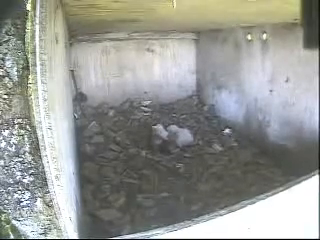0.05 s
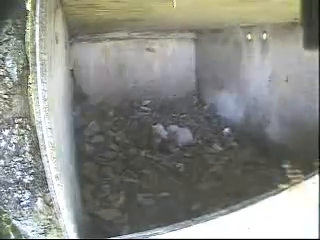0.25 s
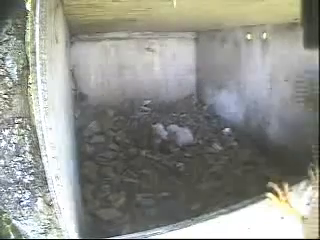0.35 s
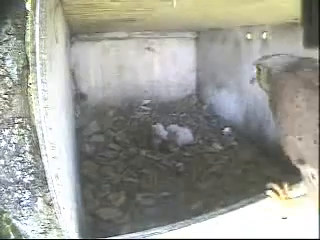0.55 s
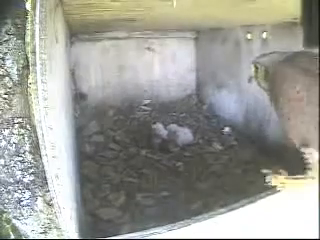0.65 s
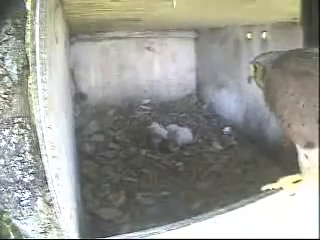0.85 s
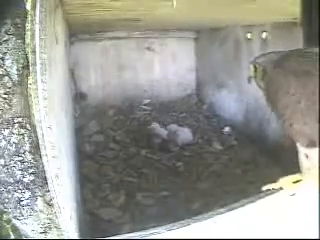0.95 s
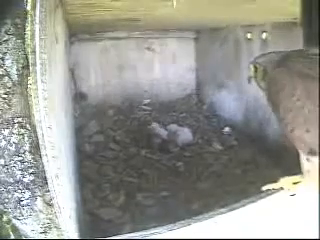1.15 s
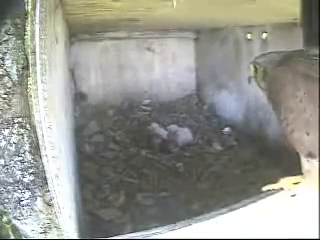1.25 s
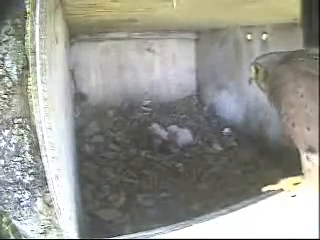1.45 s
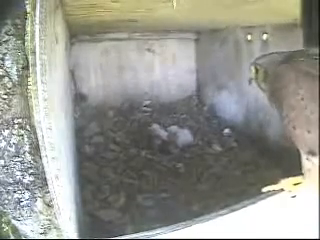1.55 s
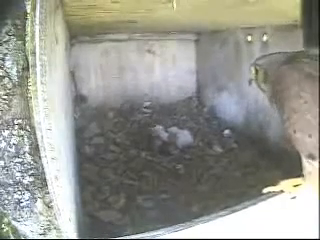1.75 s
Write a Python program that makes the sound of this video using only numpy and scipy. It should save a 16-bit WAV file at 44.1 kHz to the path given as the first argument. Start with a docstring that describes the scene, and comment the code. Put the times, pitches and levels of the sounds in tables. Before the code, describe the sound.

Close claw taps on wood as a falcon lands at a nest box: one loud, squeaky stamp, small clicks and scratches as it shifts its feet, then another stamp. Hiss and faint outdoor air continue behind.

```python
"""Falcon on a nestbox ledge

A falcon lands on a wooden nestbox and shifts its feet, close to a small camera microphone.
Two hard stamps squeal near 6 kHz and overload the input; toes knock, claws tick and scrape,
soles pad and slide. Behind the bird lie a slowly rising hiss, outdoor air and a faint mains hum."""
import sys
import numpy as np
from scipy import signal
from scipy.fft import rfft, irfft
from scipy.io import wavfile
from scipy.ndimage import uniform_filter1d

SR = 44100
rng = np.random.default_rng(int(sys.argv[2]) if len(sys.argv) > 2 else 0)


def dump(signal):
    """Clip the signal to [-1, 1] and save it as 16-bit WAV at the path in sys.argv[1]."""
    limited = np.clip(np.atleast_2d(signal).T, -1, 1)
    pcm = np.round(limited * 32767).astype(np.int16)
    wavfile.write(sys.argv[1], SR, pcm)


N = 77175
T = np.arange(N) / SR

# Hard stamps, right by the microphone. Each row: start and grip length in seconds, squeal in dB, pitch in
# Hz at the bite, a third through and at the end, rasp and box ring in dB, thud time in seconds, thud in dB.
STAMPS = [(0.2535, 0.0144, 6.5, 6435, 5673, 6048, -9, -14.5, .2700, -17.5),
          (1.4507, .0130, 3.5, 6173, 6148, 6244, -8.5, -25.5, 1.4675, -19.5)]
# Claws slipping free. Each row: start in seconds, then snap, hollow knock and claw ring in dB.
SNAPS = [(0.2642, 3, -11.5, -16), (0.2677, -9, -21, -23), (1.4645, -14, -50, -7)]
# Toes on the ledge. Each row: start in seconds, wood and crack in dB, pitch factor,
# hardness in dB per octave.
KNOCKS = [(0.2274, -13.5, -14.5, 1, 7), (0.2311, -18, -13, 0.98, -3), (0.2537, -10, -28, 1.13, 1.5),
          (0.2678, -13.5, -28, 1.35, -8), (.7752, -14, -17, 1.06, 4), (1.4248, -13, -13, 1.02, 3),
          (1.4280, -32, -16, 1, 4), (1.4507, -12.5, -23, 1.16, -6)]
# Claw tips touching down. Each row: start in seconds, level in dB, pitch in Hz.
TICKS = [(.3465, -19, 6000), (.4178, -1, 5700), (.4209, -12, 5700), (.4229, -8, 5600), (.4332, -12, 5700),
         (.6995, -18, 6000), (.7057, -18, 5700), (.7215, -15, 6200), (.7714, -7, 7000), (.7958, -16, 5900),
         (.8063, -8, 5900), (.8299, -7, 5750), (.9072, -4, 5800), (.9218, -15, 5500)]
# Dragged claws. Each row: start and length in seconds, level in dB, band centre in Hz.
SCRAPES = [(0.376, 0.033, -26, 5040), (.448, 0.017, -28.5, 5600), (0.601, 0.009, -19, 4350),
           (0.703, 0.013, -24, 4640), (0.715, 0.02, -25, 5950), (0.7705, 0.0093, -15.5, 7000),
           (0.791, 0.018, -25.5, 5470), (0.8072, 0.0039, -18.5, 5300), (0.8325, .007, -16.5, 5370),
           (0.877, .005, -32, 4560), (0.882, 0.021, -22.5, 5230), (0.91, 0.0081, -19, 5800),
           (.9160, 0.015, -27.5, 5400)]
# Soft footfalls. Each row: start in seconds, level in dB, pitch factor.
STEPS = [(.3460, -19.5, 0.99), (0.3625, -20.5, 0.98), (.3650, -18.5, 0.93), (0.397, -25, 0.72),
         (.4345, -26, 1), (0.609, -24, 1.11), (.7235, -21, 1.06), (.8340, -23, 1.05)]
# Sliding soles. Each row: start and length in seconds, level in dB.
SHUFFLES = [(0.34, 0.07, -33), (0.876, 0.051, -39)]

# What rings when struck. Each row: base frequency in Hz, relative level in dB, seconds to fall 60 dB.
LEDGE_MODES = [(1225, 2, .02), (1510, -7, .012), (2560, -5, .012), (2900, -10, .010), (3720, -5, .011),
               (4080, -5, .012), (4750, -9, .008), (5600, -8, .008), (7000, -10, .008)]
BOX_MODES = [(610, -20.5, 0.071), (810, -9.5, 0.033), (1290, -26, 0.035), (1554, -1.5, 0.02),
             (1660, -15, .018)]
CLAW_MODES = [(3120, -3, .03), (3600, -12, 0.031)]

# Noise spectra, close sounds first. Each row: frequency in Hz, relative level in dB.
GRIP_RASP = [(150, -14.5), (700, -14), (1500, -30), (2300, -9), (2800, -4), (3150, 0), (3600, 4),
             (4100, -13.5), (5200, -0.5), (6200, 2), (6700, 8), (7400, -16), (8500, -7), (9300, -1),
             (10200, -42), (16000, -51)]
BOX_RING = [(300, -31), (3000, -16.5), (4900, -20), (5750, 7.5), (6500, -14), (8000, -22), (10000, -21),
            (13000, -75)]
DRY_CRACK = [(200, -12), (900, -4), (1300, 3.5), (2000, -20), (2700, 3.5), (4200, 5.5), (6000, -2.5),
             (7700, 0.5), (8800, -39), (16000, -51)]
WOOD_GRAIN = [(200, 22.5), (1000, 6), (1900, 3.5), (3000, 1), (4500, 0), (6000, 4), (7800, -2.5),
              (9500, -18), (13000, -53)]
SOLE_RUB = [(40, -27), (90, 1.5), (160, 2), (260, -23), (520, -6), (615, 11), (720, -8), (1100, -13),
            (1550, 1), (2100, -14.5), (4000, -13), (9000, -24)]
HISS = [(1000, -23.5), (2000, -14.5), (3200, -8.5), (4300, -6.5), (5100, -1.5), (5750, 1.5), (6350, 0),
        (7000, -8), (8000, -12), (9000, -21), (10200, -24), (11500, -52), (13000, -70)]
OUTDOOR_AIR = [(20, -14), (60, -5.5), (130, -14.5), (300, -3), (700, -1.5), (980, 2.5), (1150, -1),
               (1380, -10), (1850, -3), (2500, -12), (4000, -8.5), (9000, -52)]
LOW_RUMBLE = [(3, 9.5), (12, -5), (30, -15), (60, -16), (150, -53)]
# Harmonics of the mains. Each row: frequency in Hz, rms level in dB.
MAINS_HUM = [(100, -57), (150, -53.5), (200, -55), (250, -57.5), (300, -59), (350, -55.5)]


def stamps():
    """Claws bite and squeal at a pitch that bends with the grip; then the bird's weight thuds down."""
    rise_s, thud_s, waver_hz = 0.0034, 0.006, 90.3
    out, rasp, ring = 0, noise(GRIP_RASP), noise(BOX_RING)
    waver = walk(rate=600) * waver_hz
    for start, grip, db, bite_hz, mid_hz, end_hz, rasp_db, ring_db, thud_at, thud_db in STAMPS:
        hz = np.interp(T, start + grip * np.array([0, 1 / 3, 1]), [bite_hz, mid_hz, end_hz]) + waver
        squeal = np.sin(2 * np.pi * np.cumsum(hz * (T > start)) / SR)
        out += undb(db) * squeal * envelope(start, rise_s, hold=grip - rise_s, t60=0.025)
        out += undb(rasp_db) * rasp * envelope(start, rise=0.00013, hold=grip + 0.0025, t60=0.013)
        out += undb(ring_db) * ring * envelope(start, rise=grip, hold=grip, t60=0.16)
        out += undb(thud_db) * np.exp(-(2 * (T - thud_at) / thud_s) ** 2)
    return out


def claw_snaps():
    """A claw slips free in a stamp: a snap, its own short ring and a hollow knock of the box."""
    hollow_hz, hollow_t60_s = 381.15, 0.026
    out, crack = 0, noise(DRY_CRACK)
    for at, db, knock_db, ring_db in SNAPS:
        out += undb(db) * crack * envelope(at, rise=0.0002, hold=0, t60=0.0048)
        out += undb(ring_db) * strike(at, CLAW_MODES)
        out += strike(at, [(hollow_hz, knock_db, hollow_t60_s)])
    return out


def toe_knocks():
    """A toe hits the ledge: a dry crack and short wooden modes, brighter under a harder touch."""
    out, crack = 0, noise(DRY_CRACK)
    lowest_hz = LEDGE_MODES[0][0]
    for at, wood_db, crack_db, pitch, hardness in KNOCKS:
        modes = [(hz, db + hardness * np.log2(hz / lowest_hz), t60) for hz, db, t60 in LEDGE_MODES]
        out += undb(wood_db) * strike(at, modes, pitch)
        out += undb(crack_db) * crack * envelope(at, rise=0.00022, hold=0, t60=0.017)
    return band(out, hz=855, kind="high", order=3)


def claw_ticks():
    """A claw tip touches: a few bright cycles and a small click."""
    rise_s, click_db = 0.0004, -15
    out, crack = 0, noise(DRY_CRACK)
    for at, db, hz in TICKS:
        age = np.maximum(T - at, 0)
        ping = age / rise_s * np.exp(1 - age / rise_s) * np.sin(2 * np.pi * hz * age)
        click = undb(click_db) * crack * envelope(at, rise=0.00026, hold=0, t60=0.01)
        out += undb(db) * (ping + click)
    return out


def claw_scrapes():
    """A dragged claw catches on the grain in quick, uneven slips, easing off along the stroke."""
    slips_per_s, sag_db = 3500, 4.5
    catches = rng.random(N) < slips_per_s / SR
    kicks = catches * rng.choice([-1, 1], N) * (1 + rng.random(N))
    out, slips = 0, colour(kicks, WOOD_GRAIN)
    for at, length, db, hz in SCRAPES:
        claw = unit(signal.lfilter(*signal.iirpeak(hz, Q=1.63, fs=SR), slips))
        progress = np.clip((T - at) / length, 0, 1)
        out += undb(db - sag_db * progress) * claw * envelope(at, rise=0.001, hold=length, t60=0.013)
    return out


def footfalls():
    """The pads of the feet sound the lower modes of the box."""
    return sum(undb(db) * strike(at, BOX_MODES, pitch) for at, db, pitch in STEPS)


def sole_shuffles():
    """A sole slides and softly rubs the box into sound."""
    rub = sum(undb(db) * envelope(at, rise=0.0089, hold=length, t60=0.061) for at, length, db in SHUFFLES)
    return noise(SOLE_RUB) * rub


def background():
    """Behind the bird: rising hiss, outdoor air, low rumble and mains hum."""
    hiss_db, hiss_db_per_s, air_db, rumble_db = -34, 3, -38, -38.5
    hiss = noise(HISS) * undb(hiss_db + hiss_db_per_s * T + 0.5 * walk(rate=34))
    air = noise(OUTDOOR_AIR) * undb(air_db + 0.5 * walk(rate=18))
    rumble = noise(LOW_RUMBLE) * undb(rumble_db)
    hum = sum(np.sqrt(2) * undb(db) * np.sin(2 * np.pi * (hz * T + rng.random())) for hz, db in MAINS_HUM)
    return hiss + air + rumble + hum


def strike(start, modes, pitch=1, contact_s=0.00024):
    """Damped modes after one blow, their frequencies scaled by pitch."""
    age = np.maximum(T - start, 0)
    ring = sum(undb(db) * np.sin(2 * np.pi * hz * pitch * age) * np.exp(-np.log(1000) * age / t60)
               for hz, db, t60 in modes)
    return -np.minimum(age / contact_s, 1) * ring


def envelope(start, rise, hold, t60):
    """Straight attack, then exponential release from hold seconds after the start."""
    age = T - start
    return np.clip(age / rise, 0, 1) * np.exp(-np.log(1000) * np.maximum(age - hold, 0) / t60)


def colour(x, points):
    """Shape a signal's spectrum by (Hz, dB) points, at rms 1."""
    hz, db = np.array(points).T
    bin_hz = np.maximum(np.arange(N // 2 + 1) * SR / N, 1)
    gain = undb(np.interp(np.log(bin_hz), np.log(hz), db))
    return unit(irfft(rfft(x) * gain, N))


def noise(points):
    """Noise with the given spectrum."""
    return colour(rng.standard_normal(N), points)


def walk(rate):
    """Smooth random drift at rms 1, changing about rate times a second."""
    size = int(SR / rate)
    drift = uniform_filter1d(rng.standard_normal(N), size, mode="wrap")
    return unit(uniform_filter1d(drift, size, mode="wrap"))


def band(x, hz, kind, order):
    """High-pass or low-pass filter."""
    return signal.sosfilt(signal.butter(order, hz, kind, fs=SR, output="sos"), x)


def undb(db):
    """Decibels to gain."""
    return 10 ** (np.asarray(db) / 20)


def unit(x):
    """Scale to rms 1."""
    return x / np.sqrt(np.mean(x ** 2) + 1e-18)


def scene():
    """One microphone close to the ledge; the foot sounds carry little treble above 9.5 kHz."""
    feet = toe_knocks() + claw_ticks() + claw_scrapes() + claw_snaps() + footfalls() + sole_shuffles()
    return (stamps() + band(feet, hz=9500, kind="low", order=8) + background())[None]


def record(dry):
    """The camera's input flattens the loudest peaks, dulls the treble and cuts the top."""
    clip_level, knee, top_hz = 0.63, 9.1, 16000
    oversampled = signal.resample_poly(dry, 4, 1, axis=-1)
    flattened = oversampled / (0.5 + np.abs(oversampled / clip_level) ** knee) ** (1 / knee)
    clipped = signal.resample_poly(flattened, 1, 4, axis=-1)
    dull = band(clipped, hz=9840, kind="low", order=2)
    return signal.sosfilt(signal.ellip(10, 0.2, 80, top_hz, fs=SR, output="sos"), dull)


dry = scene()
out = record(dry)
dump(out)
```